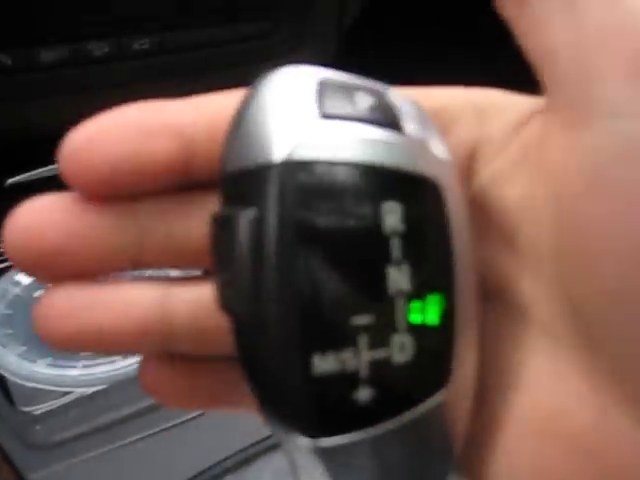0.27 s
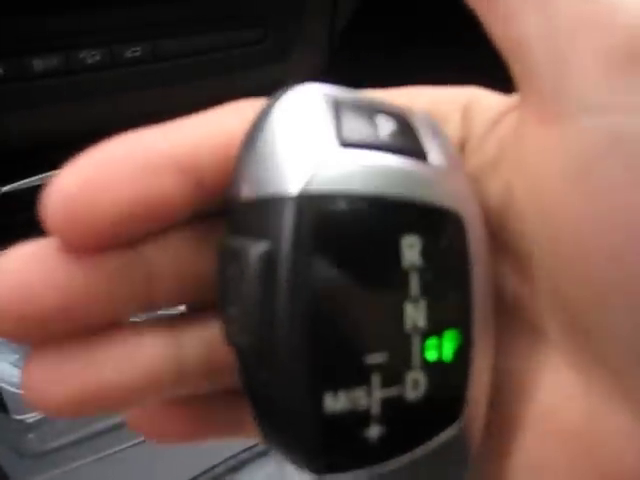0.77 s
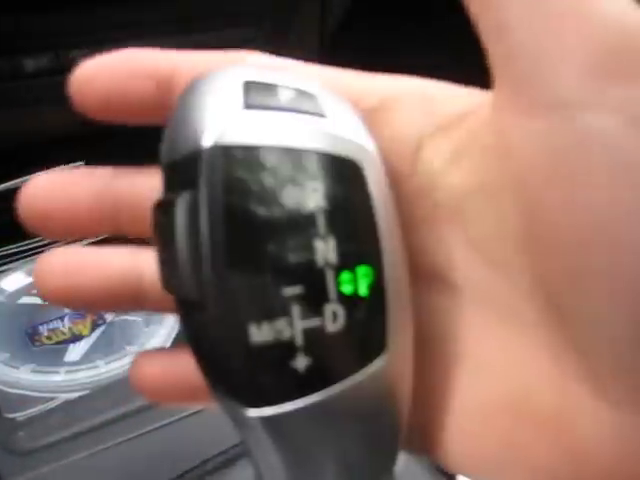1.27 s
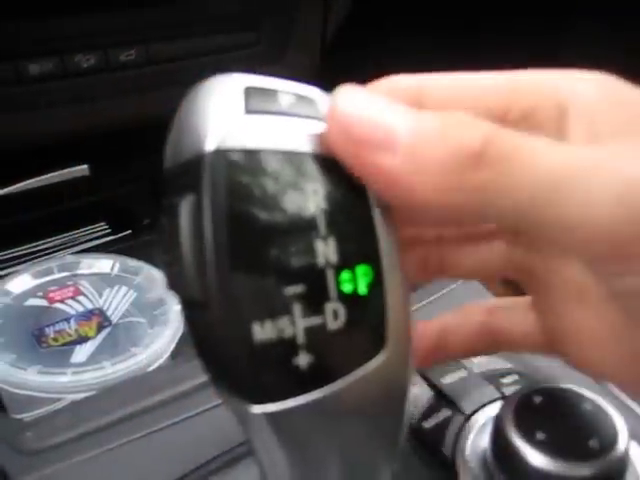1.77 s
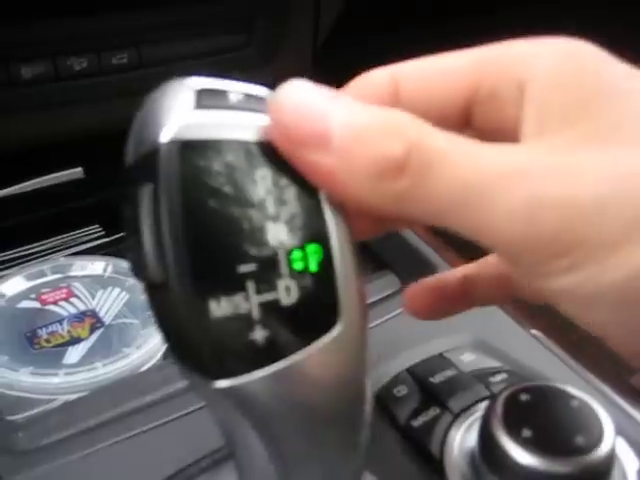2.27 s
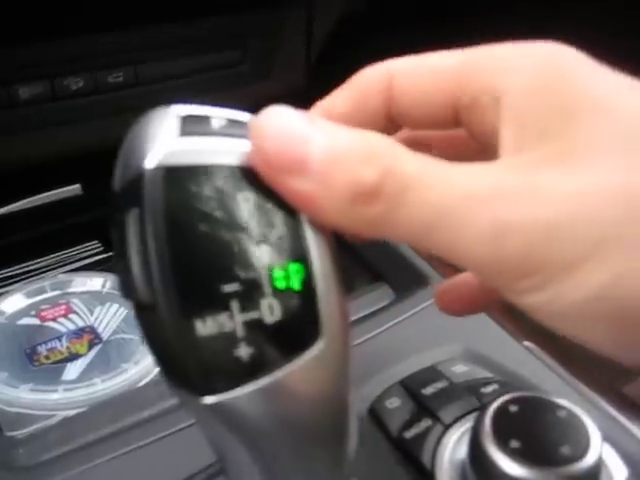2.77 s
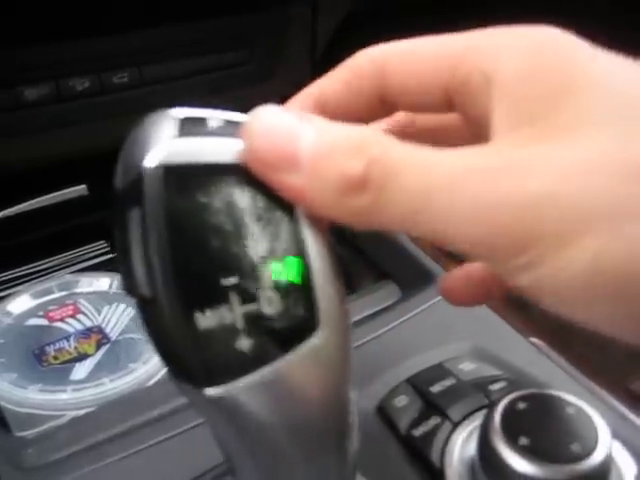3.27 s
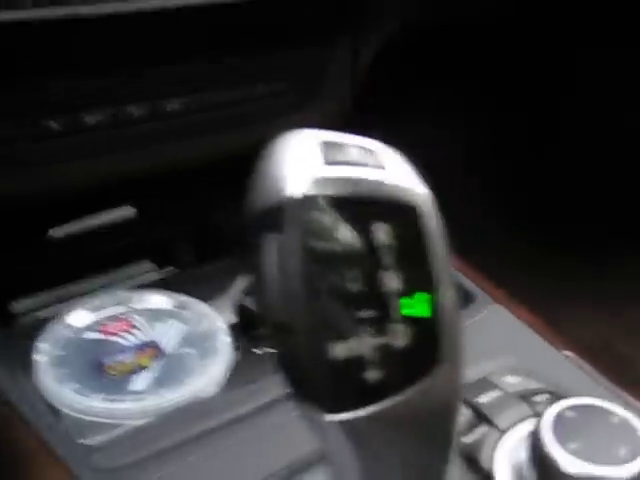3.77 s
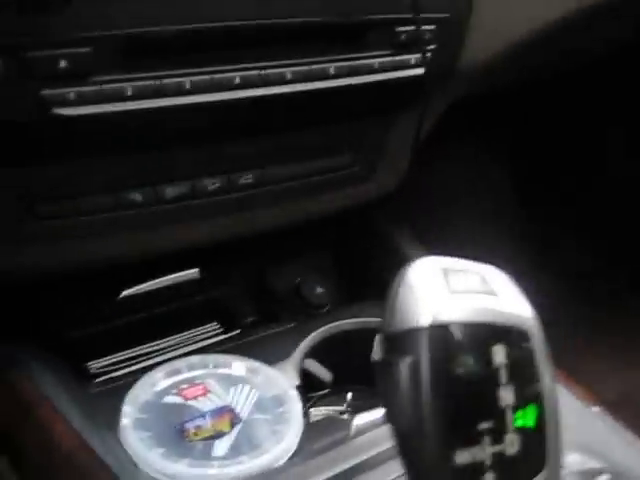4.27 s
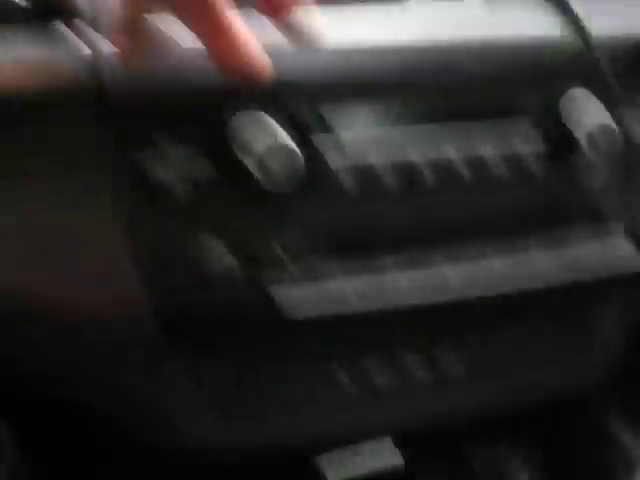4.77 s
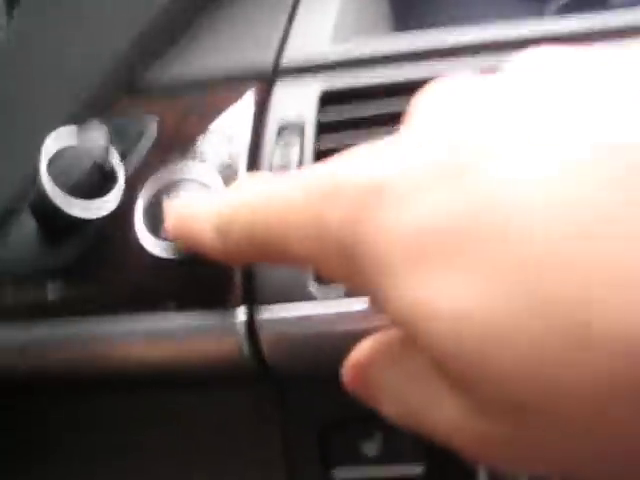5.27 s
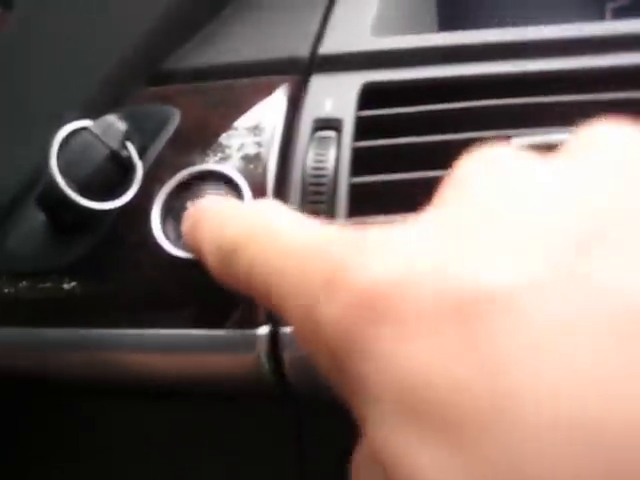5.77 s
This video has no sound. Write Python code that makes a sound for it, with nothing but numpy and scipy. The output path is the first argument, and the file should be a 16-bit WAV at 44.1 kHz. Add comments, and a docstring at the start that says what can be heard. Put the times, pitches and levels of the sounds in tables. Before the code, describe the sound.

In a quiet parked car, a plastic gear selector snaps and knocks at irregular intervals, a sleeve rasps, then a start button clicks sharply over faint hum and hiss.

```python
"""Gear selector and start button in a parked car

A hand works the electronic gear selector: its unlock button snaps and the sprung lever knocks on its stops.
The hand slides off, a sleeve rasps as the arm reaches over, and a finger presses and releases the start button.
Snaps and knocks are decaying modes with bursts of filtered contacts; friction is uneven noise, cloth is ticks.
Idle hum (sines) and vent air (noise) grow as the microphone nears them, over its own hiss and thin whine.
"""
import sys
import numpy as np
from scipy import signal
from scipy.fft import rfft, irfft, next_fast_len
from scipy.io import wavfile

SR = 44100
rng = np.random.default_rng(int(sys.argv[2]) if len(sys.argv) > 2 else 0)


def output_pcm(signal):
    """Save a mono or channel-first signal as 16-bit PCM at the path in sys.argv[1].

    Samples are clipped to [-1, 1] before scaling.
    """
    pcm = np.clip(np.atleast_2d(signal).T, -1, 1) * 32767
    wavfile.write(sys.argv[1], SR, np.round(pcm).astype(np.int16))


N = 265393
TIME = np.arange(N) / SR
AGE = TIME[:SR // 3]  # time since a blow [s]


# sprung catches of the selector and start button flip over:
# (time [s], ring level [dB], main ring frequency [Hz], crack level [dB])
SNAPS = [(.6321, -15, 2580, -31), (.6412, -10.5, 2450, -18), (1.054, -34, 2480, -46),
         (1.115, -23, 2040, -32), (1.1715, -27, 2500, -48), (1.1763, -24, 3320, -22),
         (1.2666, -33.5, 2480, -52), (2.8384, -20.5, 2640, -21.5), (3.4142, -11, 1950, -23),
         (3.4342, -28, 4200, -36), (4.013, -32, 1460, -37), (4.0623, -44, 3220, -35),
         (5.164, -27, 3560, -22), (5.192, -23, 1530, -20.5), (5.4288, -29, 1680, -27.5),
         (5.9228, -10, 2980, -15), (5.9389, -8, 3920, -21), (5.9407, -3.5, 2490, -11)]


def catches():
    """Snap-through: a sprung catch releases its stored energy abruptly as it flips over."""
    return snaps(SNAPS, t60=.014, low_hz=1190, push=.000096, scrape_db=-16.5, scrape_t60=0.048)


# modes of a catch: (multiple of its main ring frequency [1], level [dB], t60 [s])
CATCH = [(.74, -18.5, 0.062), (.83, -11.5, 0.021), (1, -5, 0.017), (1.08, -5, .006), (1.44, -24, 0.013),
         (1.76, -25, 0.01)]
# spectrum of a catch's contacts: (frequency [Hz], level [dB])
CRACK = [(100, -13.5), (400, -5.5), (1200, -1), (2500, 0.5), (4500, 0), (6500, -3.5), (8200, -2.5),
         (11000, -9.5), (15500, -18)]


def snaps(rows, t60, low_hz, push, scrape_db, scrape_t60):
    """Impact excitation: a scrape grows up the ramp, then a bright crack sets a small plastic part ringing."""
    out = np.zeros(N)
    for s, ring_db, hz, crack_db in rows:
        # reversed decay: the scrape swells until the flip
        scrape = colour(chatter(scrape_t60)[::-1], CRACK, hz)
        add(out, s - AGE[-1], undb(crack_db + scrape_db) * scrape)
        body = undb(ring_db) * ring(CATCH, low_hz, push, hz)
        crack = undb(crack_db) * colour(chatter(t60), CRACK)
        add(out, s, body + crack)
    return out


# modes of the lever in its console: (frequency [Hz], level [dB], t60 [s])
CONSOLE = [(197, -6.5, 0.1), (244.7, 2, 0.081), (291.4, -3.5, 0.11), (380, -20, 0.13), (497, -7, 0.037),
           (540.4, -9, 0.13), (584, -15.5, 0.16), (687, -12, 0.071), (865, -9, 0.054), (1003, -10, 0.058),
           (1115, -9, 0.045), (1775, -5, 0.05), (1880, -5, 0.055)]


def lever():
    """Modal resonance: the blows of the lever on its stops set the console ringing."""
    return knocks(lever_blows(), CONSOLE, low_hz=175, push=.002)


# the lever is pushed against a stop:
# (time of touch [s], touch clack level [dB], touch clack cut-off [Hz], seating thump level [dB])
KNOCKS = [(.038, -46, 5000, -42.5), (.6412, -37, 2500, -32), (1.116, -25, 1700, -18.5),
          (1.178, -31, 1800, -29.5), (1.677, -40.5, 595, -39), (2.17, -40, 3020, -40),
          (2.1944, -33.5, 1100, -28), (2.8385, -41, 2600, -39), (3.336, -31.5, 2000, -26.5),
          (3.3982, -12.5, 2100, -19), (3.733, -37, 900, -35.5)]
# let go, the lever springs home, then rebounds; columns as in KNOCKS
SPRING_HOME = (3.4145, -11, 1500, -16.5)
REBOUND_S, REBOUND_DB = .0205, -13.5  # time between landings [s], level change at each [dB]
# seating after the touch: delay [s], clack relative to the touch [dB], share of its cut-off
SEAT_S, SEAT_DB, SEAT_DULL = .0082, -7.5, 0.41
TOUCH_DB = -15  # thump at the touch, relative to the seating [dB]
TOUCH_T60_S, SEAT_T60_S = 0.042, 0.072  # clack decays


def lever_blows(count=3):
    """Play and restitution: each landing is a bright touch, then a dull seating; rebounds lose energy."""
    home_s, home_clack_db, home_cut_hz, home_thump_db = SPRING_HOME
    landings = list(KNOCKS)
    for k in range(count):
        loss_db = k * REBOUND_DB
        landings.append((home_s + k * REBOUND_S, home_clack_db + loss_db, home_cut_hz, home_thump_db + loss_db))
    blows = []
    for s, clack_db, cut_hz, thump_db in landings:
        blows.append((s, clack_db, cut_hz, TOUCH_T60_S, thump_db + TOUCH_DB))
        blows.append((s + SEAT_S, clack_db + SEAT_DB, cut_hz * SEAT_DULL, SEAT_T60_S, thump_db))
    return blows


# the finger lands on the dashboard:
# (time [s], clack level [dB], clack cut-off [Hz], clack t60 [s], thump level [dB])
PUSHES = [(5.158, -17.5, 1200, 0.0092, -34), (5.1655, -22.5, 1500, 0.035, -18.5)]
# the start button meets its stops; columns as in PUSHES
RETURNS = [(5.781, -34, 700, 0.075, -26.5), (5.9238, -27, 1400, 0.07, -21), (5.9402, -21, 2500, 0.024, -35)]
# modes of the dashboard and of the button's housing: (frequency [Hz], level [dB], t60 [s])
DASH = [(70, -10, 0.1), (180, -1.5, 0.04), (330, -1, 0.044), (413, -2.5, 0.04), (556, -3, 0.041)]
BUTTON = [(124, -5, 0.067), (427, -4, 0.084), (526, -2.5, 0.072), (760, -1, .04), (1004, 4, 0.064),
          (1160, 4, 0.032)]


def start_button():
    """Modal resonance: the finger strikes the dashboard, and the button strikes its housing."""
    landing = knocks(PUSHES, DASH, low_hz=60, push=0.00043)
    stops = knocks(RETURNS, BUTTON, low_hz=90, push=0.0037)
    return landing + stops


# spectrum of a housing's contacts: (frequency [Hz], level [dB])
CLACK = [(25, -26), (55, -13), (115, -30), (195, 2), (260, 6), (380, -3), (500, 9), (700, 1), (1050, 3.5),
         (1450, -2), (2000, 2), (2600, -1.5), (4300, 0.5), (5300, -10.5), (8500, -8.5), (15000, -20)]


def knocks(blows, modes, low_hz, push):
    """Contact stiffness: the housing clacks, duller for a softer contact, and the panel around it thumps."""
    out = np.zeros(N)
    thump = ring(modes, low_hz, push)
    for s, clack_db, cut_hz, t60, thump_db in blows:
        clack = undb(clack_db) * colour(chatter(t60, rise=0.00071), CLACK, cut_hz)
        add(out, s, clack + undb(thump_db) * soften(thump, cut_hz))
    return out


# loose plastic parts rattle under the hand, and at 5.39 s a fingernail scrapes the button: # (time [s], ring
# level [dB], main ring frequency [Hz], rattle level [dB])
RATTLES = [(1.13, -30, 2700, -45), (2.84, -27, 1480, -39), (4.359, -25, 1440, -36.5),
           (5.173, -33, 2480, -25.5), (5.3888, -15.5, 2380, -22.5), (5.776, -21, 3440, -32.5),
           (5.887, -38, 2690, -32.5), (5.947, -23, 1950, -36), (5.9584, -16, 2380, -25.5),
           (5.999, -26, 3260, -39)]


def loose_parts():
    """Repeated impact: loose parts chatter against their seats, dying away more slowly than a snap."""
    return snaps(RATTLES, t60=0.07, low_hz=1200, push=0.00027, scrape_db=-16, scrape_t60=0.051)


# the arm reaches over: (time the drag is firm [s], level [dB], swell [s], hold [s], release [s])
REACH = [(4.78, -26, 0.35, 0.31, .7)]
# spectrum of the cloth: (frequency [Hz], level [dB])
RASP = [(1500, -22), (3500, -9), (5500, -1), (9500, 0), (12000, -10), (15500, -22)]
SLEEVE_START_S, SLIP_EVERY_S = 4.589, .0297


def sleeve(spacing=.0016, jitter_s=.0025, uneven_db=2.0, thread_db=3.0, count=19, size=9):
    """Stick-slip: at a nearly steady rate the cloth slips, dragging a few threads, one tick a thread."""
    ticks = np.zeros(N)
    for k, (late, firm) in enumerate(rng.standard_normal((count, 2))):
        s = SLEEVE_START_S + k * SLIP_EVERY_S + jitter_s * late
        times = s + spacing * (np.arange(size) + rng.uniform(-.5, .5, size))
        thread_levels = uneven_db * firm + thread_db * rng.standard_normal(size)
        ticks[(times * SR).astype(int)] += undb(thread_levels)
    return colour(ticks * strokes(REACH), RASP)


# the palm slides over the selector, a sleeve brushes past at 3.8 s, the fingertip rubs on the start button, #
# and a hollow scuff is heard as the hand moves away: # (time the pressure is firm [s], level [dB], swell [s],
# hold [s], release [s])
SLIDE = [(.05, -53, .2, 0.019, .1), (1.12, -47.5, .08, 0.027, .08), (1.405, -46.5, 0.067, 0.072, .2),
         (1.505, -41.5, .1, .02, 0.12), (3.798, -40, 0.021, 0.022, 0.021), (3.97, -53.5, 1.7, .1, 1.0)]
PRESS = [(5.17, -35.5, .02, 0.018, 0.1), (5.295, -33, .12, 0.033, .22), (5.775, -43.5, .09, .02, .15)]
SCUFFS = [(4.25, -48, .2, .06, .1), (4.355, -43.5, .1, 0.022, .06)]
# their spectra, in the same order: (frequency [Hz], level [dB])
PALM = [(400, -24), (1300, -9), (2300, -4), (2900, -3.5), (4100, -0.5), (6000, -3), (8500, -9),
        (10500, -21), (15000, -31)]
FINGER = [(300, -22), (700, -13), (1000, -6), (1200, -9), (1400, -1), (1700, -4.5), (2000, 0),
          (3250, -13.5), (3800, -9), (5400, -15), (6800, -7), (8500, -13.5), (14000, -30)]
HOLLOW = [(150, -14), (330, -6), (560, -11), (790, 0), (1100, -9), (2100, -13.5), (3200, -17), (4500, -12),
          (6000, -20), (14000, -33)]


def skin_friction():
    """Sliding friction: palm and sleeve, fingertip and scuff differ in spectrum and in unevenness."""
    palm = rub(SLIDE, PALM, grain_db=3, uneven_db=1.5)
    finger = rub(PRESS, FINGER, grain_db=4.5, uneven_db=2.0)
    scuff = rub(SCUFFS, HOLLOW, grain_db=3, uneven_db=2.5)
    return palm + finger + scuff


def rub(rows, spectrum, grain_db, uneven_db):
    """Friction noise: dense micro-slips of unequal size under an unsteady pressure."""
    slips = unit(rng.standard_normal(N) * undb(grain_db * rng.standard_normal(N)))
    return colour(slips, spectrum) * strokes(rows) * undb(uneven_db * walk(90))


def cabin(x, t60=0.13, wet_db=-21.5, dull_hz=6000):
    """Reverberation: close, quickly absorbed reflections from glass and trim."""
    late = chatter(t60) * (AGE > .004)  # the direct sound comes first
    tail = colour(late, [(100, 0), (10000, 0)], dull_hz)
    tail /= np.sqrt(np.sum(tail ** 2))
    return x + undb(wet_db) * signal.fftconvolve(x, tail)[:N]


# air grows louder as the microphone nears the dashboard, and the hum follows: (time [s], air level [dB])
NEAR = [(0, -62), (3.2, -59), (4.0, -52), (4.7, -51.5), (5.4, -44), (6.02, -40)]
# partials of the idle: (multiple of the firing rate [1], level [dB])
IDLE = [(1, -5), (2, -9.5), (3, -19), (3.75, -5.5), (4.5, -9.5)]
# spectrum of the vent's air: (frequency [Hz], level [dB])
VENT = [(59, -49), (100, -14), (126, -4.5), (162, -14.5), (192, -5.5), (375, -8), (582, -6), (688, -5.5),
        (1020, -1.5), (2520, -18.5), (2920, -13.5), (4450, -17), (7830, -18.5), (12700, -34), (15000, -33)]
IDLE_HZ, HUM_DB = 66.8, -9  # mean firing rate; hum gain before NEAR


def idle_and_vent():
    """Periodic and turbulent sources: the engine hums through the dashboard while air leaves the vent."""
    turns = np.cumsum(IDLE_HZ * (1 + 0.0083 * walk(6))) / SR
    hum = np.zeros(N)
    for multiple, db in IDLE:
        level = undb(db + 2.0 * walk(7))
        hum += level * np.sin(2 * np.pi * (multiple * turns + rng.random()))
    air = colour(rng.standard_normal(N), VENT) * undb(1.4 * walk(16))
    return (np.sqrt(2) * undb(HUM_DB) * hum + air) * curve(NEAR)


# spectrum of the microphone hiss: (frequency [Hz], level [dB])
HISS = [(20, -18), (40, -2.5), (64, 0), (110, -3.5), (230, -0.5), (420, -2.5), (560, -2.5), (1000, -5),
        (2300, -7.7), (4450, -11), (5050, -7.2), (5700, -10), (7000, -14.5), (7600, -9), (8700, -15),
        (9750, -5.5), (10700, -12), (12800, -17.5), (15200, -16.5)]
# partials of the whine: (multiple of its frequency [1], rms level [dB])
WHINE = [(1, -57), (2, -64.5)]
WHINE_HZ, RESTART_HZ = 7570, 30


def microphone(hiss_db=-50.5):
    """Self-noise: steady hiss, and a thin electronic whine whose oscillator restarts at a regular rate."""
    turns = WHINE_HZ * (TIME % (1 / RESTART_HZ))
    whine = sum(undb(db) * np.sin(2 * np.pi * k * turns) for k, db in WHINE)
    hiss = undb(hiss_db) * colour(rng.standard_normal(N), HISS)
    return hiss + np.sqrt(2) * whine


def ring(modes, low_hz, push, base_hz=1):
    """Modal synthesis: decaying modes build up during a push [s]; a small part radiates little below low_hz."""
    motion = sum(undb(db) * fade(t60) * np.cos(2 * np.pi * f * base_hz * AGE) for f, db, t60 in modes)
    build_up = 1 - np.exp(-AGE / push)
    high_pass = signal.butter(2, low_hz, "high", fs=SR, output="sos")
    return signal.sosfilt(high_pass, motion * build_up)


def chatter(t60, rise=0.00036):
    """Micro-impacts: a run of tiny contacts of random sign swells at once and dies away."""
    return rng.choice([-1, 1], len(AGE)) * fade(t60) * (1 - np.exp(-AGE / rise))


def soften(x, cut_hz, share=0.74):
    """Contact duration: a padded blow leaves the higher modes quiet."""
    low_pass = signal.butter(1, min(share * cut_hz, SR / 3), fs=SR, output="sos")
    return signal.sosfilt(low_pass, x)


def strokes(rows):
    """Pressure envelope: each stroke swells from a tenth, holds, and falls to a tenth; powers add."""
    gains = []
    for s, db, swell, hold, release in rows:
        decades = np.maximum((s - TIME) / swell, (TIME - s - hold) / release).clip(0, 10)
        gains.append(undb(db) * 10 ** -decades)
    return np.linalg.norm(gains, axis=0)


def colour(x, points, cut_hz=np.inf):
    """Minimum-phase filtering: unit power gain through (Hz, dB) points, with an optional gentle treble cut."""
    size = next_fast_len(len(x) + SR // 8, True)
    size += size % 2
    f = np.arange(size // 2 + 1) * SR / size + 1  # 1 Hz offset avoids log(0)
    hz, db = np.transpose(points)
    shape = undb(np.interp(np.log(f), np.log(hz), db))
    gain = unit(shape / np.hypot(1, f / cut_hz))
    # folding the cepstrum makes the response causal
    cepstrum = irfft(np.log(gain))
    cepstrum[1:size // 2] *= 2
    cepstrum[size // 2 + 1:] = 0
    response = np.exp(rfft(cepstrum))
    return irfft(rfft(x, size) * response, size)[:len(x)]


def walk(rate):
    """Random modulation: straight lines join random knots, rate per second, scaled to rms 1."""
    knots = rng.standard_normal(int(N / SR * rate) + 2)
    return unit(np.interp(TIME * rate, np.arange(len(knots)), knots))


def fade(t60):
    """Damping: exponential decay by 60 dB in t60 seconds."""
    return np.exp(-np.log(1000) * AGE / t60)


def curve(rows):
    """Level contour: gain over time from (s, dB) points."""
    return undb(np.interp(TIME, *np.transpose(rows)))


def undb(db):
    """Logarithmic level: decibels to amplitude gain."""
    return 10 ** (np.asarray(db) / 20)


def unit(x):
    """Effective value: scale to rms 1."""
    return x / np.sqrt(np.mean(x ** 2))


def add(track, s, sound):
    """Superposition: mix a sound into the track at time s."""
    start = max(int(s * SR), 0)
    part = sound[:max(N - start, 0)]
    track[start:start + len(part)] += part


def scene():
    """Superposition: the hand's sounds reverberate in the cabin, over hum, air and microphone noise."""
    hand = catches() + loose_parts() + lever() + start_button() + sleeve() + skin_friction()
    return (cabin(hand) + idle_and_vent() + microphone())[None]


TOP_HZ = 15900


def record(dry):
    """Band limitation: the recorder's steep low-pass cuts the top."""
    low_pass = signal.ellip(10, .2, 80, TOP_HZ, fs=SR, output="sos")  # ripple, rejection [dB]
    return signal.sosfilt(low_pass, dry)


dry = scene()
out = record(dry)
output_pcm(out)
```